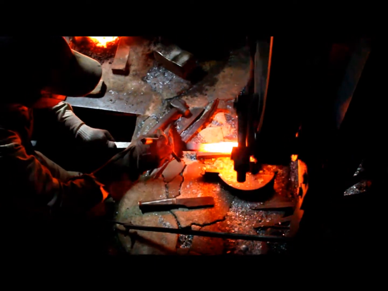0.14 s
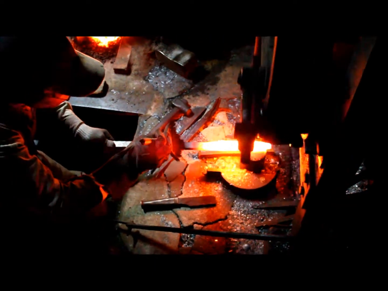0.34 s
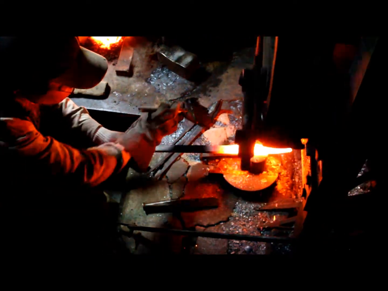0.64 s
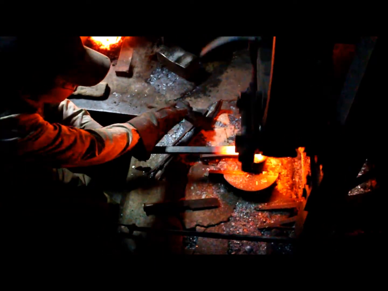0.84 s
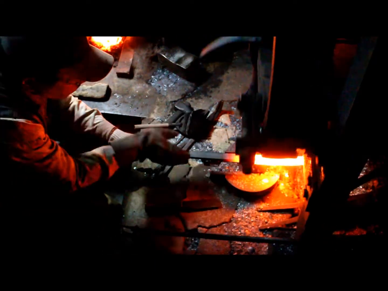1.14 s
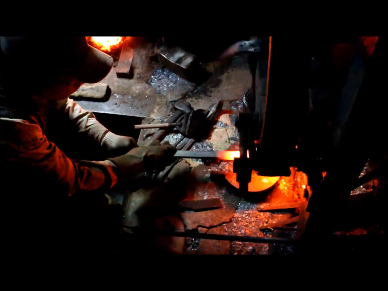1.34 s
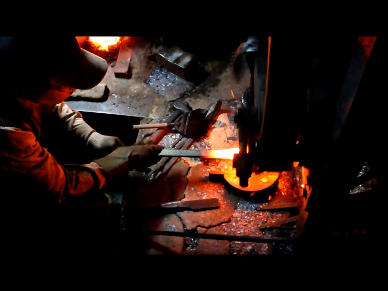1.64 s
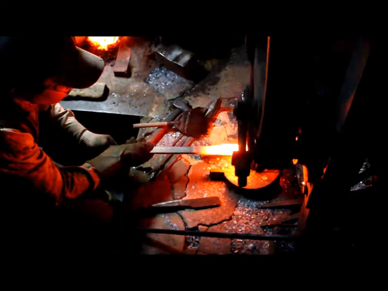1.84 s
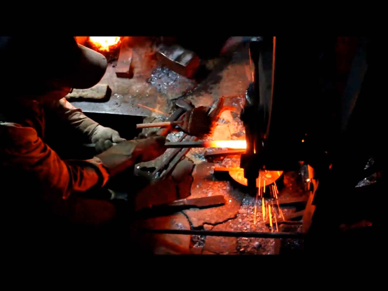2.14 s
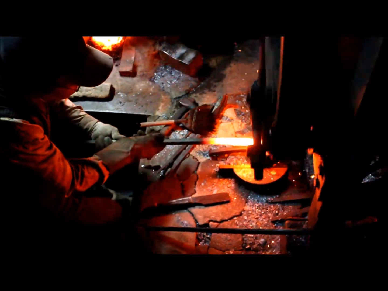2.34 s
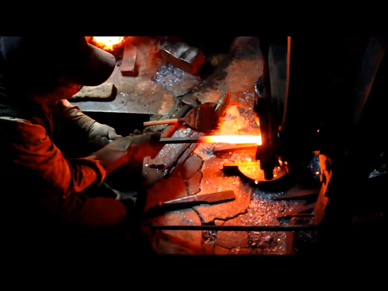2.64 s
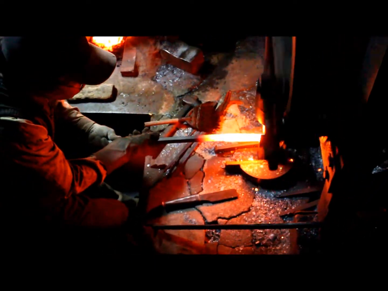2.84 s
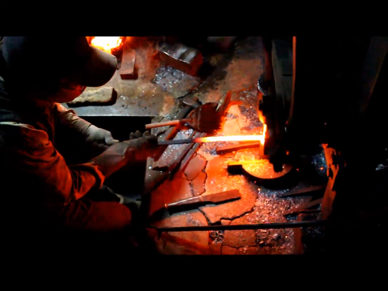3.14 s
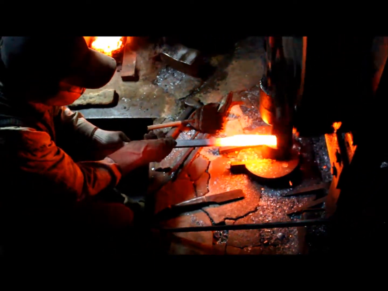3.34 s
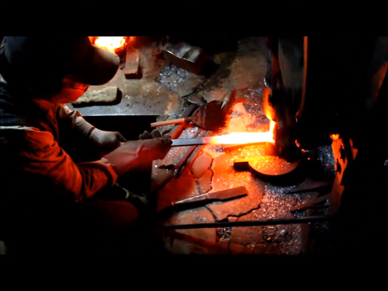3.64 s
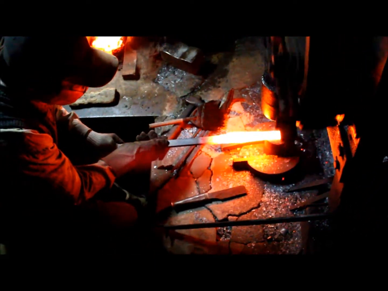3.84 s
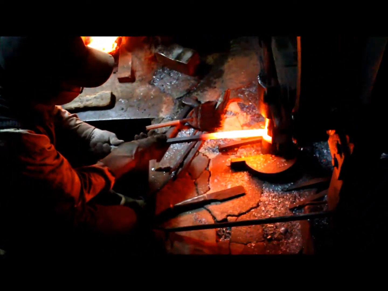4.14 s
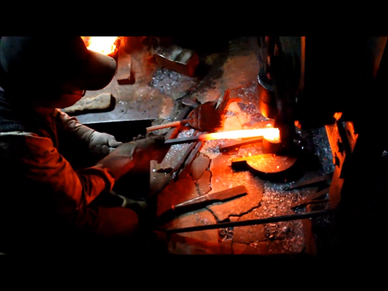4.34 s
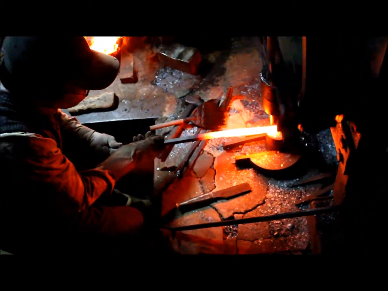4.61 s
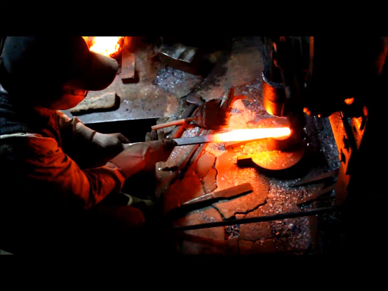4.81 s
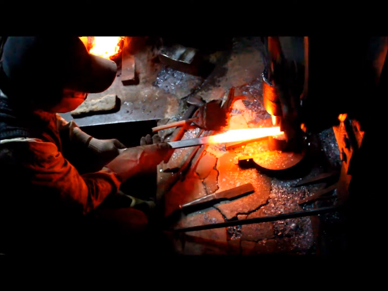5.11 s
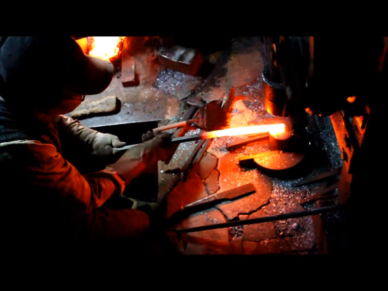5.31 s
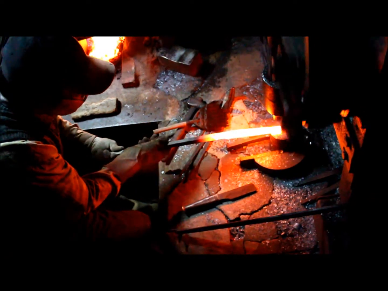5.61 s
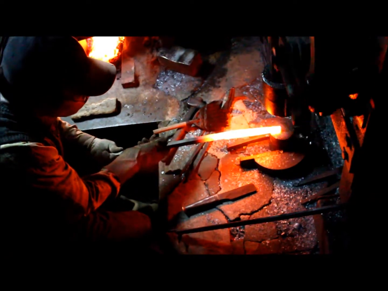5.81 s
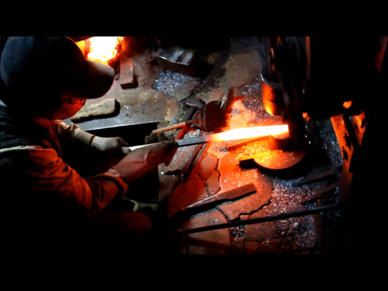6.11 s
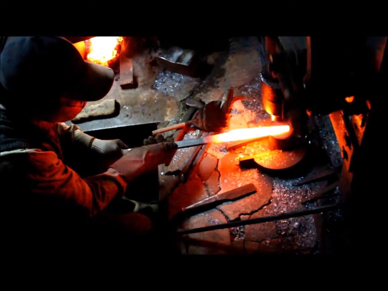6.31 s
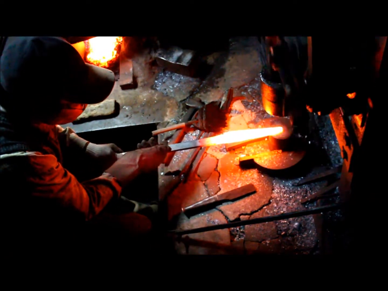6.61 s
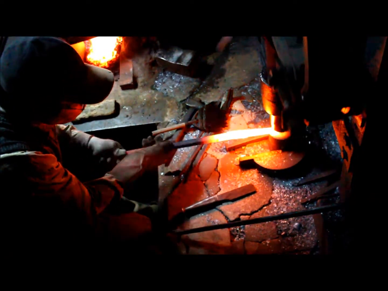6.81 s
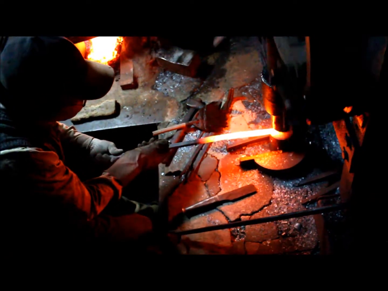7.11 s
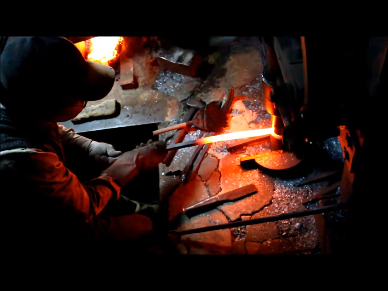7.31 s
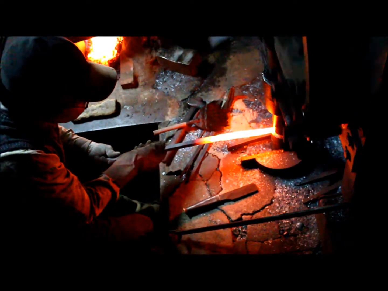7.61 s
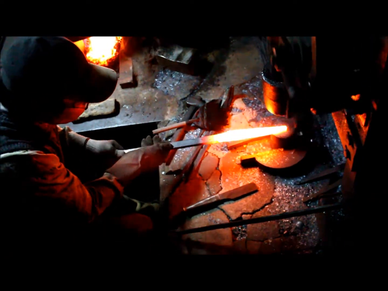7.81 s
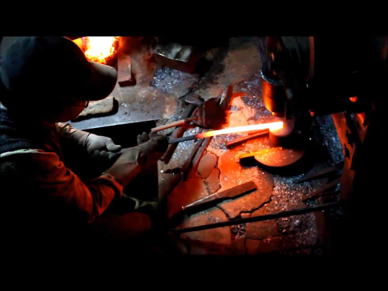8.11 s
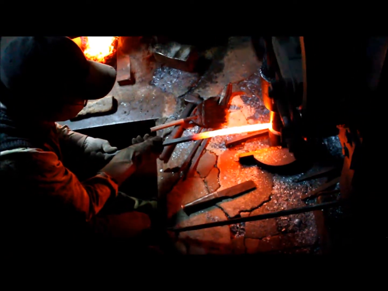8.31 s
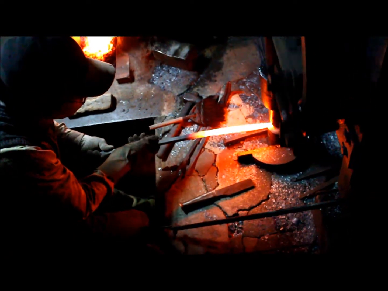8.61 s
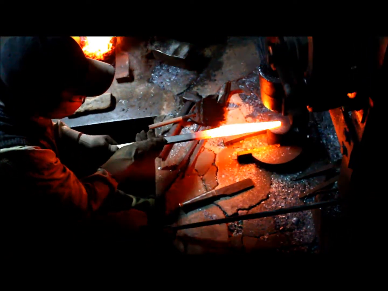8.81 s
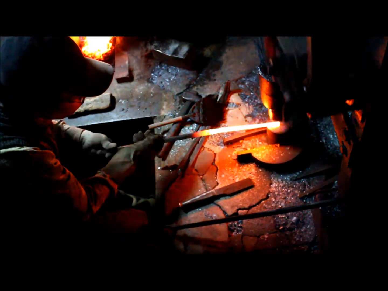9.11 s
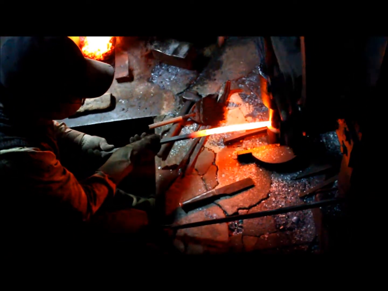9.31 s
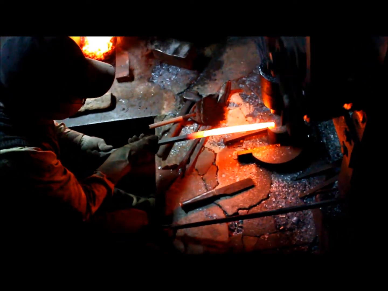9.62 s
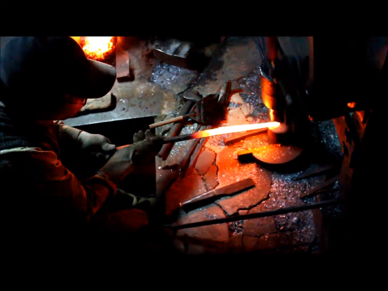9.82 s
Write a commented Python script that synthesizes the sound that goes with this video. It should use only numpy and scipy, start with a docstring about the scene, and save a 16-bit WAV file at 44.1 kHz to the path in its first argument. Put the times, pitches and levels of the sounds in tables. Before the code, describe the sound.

Rapid metallic hammering, about four strokes a second, with clattering loose ironwork, dull anvil thuds and a regular thin squeal over faint machine rumble.

```python
"""A mechanical power hammer forges hot steel in a workshop, close to a small microphone.
Slack linkage clanks, spring arms slap and the dies meet in noisy chatters that ring modes; the anvil thuds.
Rattling guides are shaped noise with clicks, and the drive belt squeals once a turn of the flywheel as a tone.
The drive and the low roar of the forge are lumpy noise beneath; a short workshop echo follows the hammer."""
import sys
import numpy as np
from scipy import signal
from scipy.fft import rfft, irfft
from scipy.io import wavfile
from scipy.ndimage import uniform_filter1d

SR = 44100
rng = np.random.default_rng(int(sys.argv[2]) if len(sys.argv) > 2 else 0)


def pcm_store(signal):
    """Save signal as 16-bit PCM."""
    levels = np.round(np.clip(np.atleast_2d(signal), -1, 1) * 32767)
    wavfile.write(sys.argv[1], SR, levels.astype(np.int16).T)


N = 438794
SIZE = 8192  # samples in one knock, thud or squeal
HZ = np.fft.rfftfreq(SIZE, 1 / SR)
T = np.arange(SIZE) / SR


def amp(db):
    """dB to gain."""
    return 10 ** (np.asarray(db) / 20)


def evened(x, count=None):
    """Scales to rms 1 over the first samples."""
    return x / np.sqrt(np.mean(x[:count] ** 2) + 1e-20)


def read(points, hz):
    """Reads a table on a log-frequency axis."""
    f, value = np.transpose(points)
    return np.interp(np.log(hz + 1), np.log(f + 1), value)


def along(curve, s):
    """Reads a curve in time."""
    return np.interp(s, *np.transpose(curve))


def add(mix, s, sound):
    """Mixes a sound in at time s, cut at the ends of the mix."""
    at = round(s * SR)
    part, sound = mix[max(at, 0):at + len(sound)], sound[max(-at, 0):]
    part += sound[:len(part)]


def rings(modes):
    """Spectrum of each mode, a sine dying by 60 dB in its t60."""
    return np.array([rfft(amp(db - 60 * T / t60) * np.sin(2 * np.pi * hz * T)) for hz, db, t60 in modes])


def causal(colour):
    """Minimum-phase spectrum of a colour, so its energy comes at the onset."""
    log_gain = np.log(amp(read(colour, HZ)))
    mirrored = np.r_[log_gain, log_gain[-2:0:-1]]
    return np.exp(np.conj(signal.hilbert(mirrored))[:len(HZ)])


def noise(colour_db, patchy_db, flicker_db, size):
    """Random short-time spectra with patches and wide flicker; colour_db(hz, t) gives the field."""
    hop = size // 4
    frames = N // hop + 5
    hz, t = np.fft.rfftfreq(size, 1 / SR), np.arange(frames) * hop / SR
    a, b, patches = rng.standard_normal((frames, len(hz), 3)).T
    patches = uniform_filter1d(patches, size=4, axis=0)
    patches = evened(uniform_filter1d(patches, size=8, axis=1))
    flicker = evened(uniform_filter1d(rng.standard_normal(frames), size=3))
    level_db = colour_db(hz[:, None], t) + patchy_db * patches + flicker_db * flicker
    z = (a + 1j * b) * amp(level_db)
    return signal.istft(z, nperseg=size, noverlap=size - hop)[1][:N]


# slack linkage taken up as the ram is driven down: (t/s, clank level/dB, chatter scale/s, guide rattle level/dB)
CLANKS = [(-.1, -29, .015, -31), (.172, -31, 0.021, -34), (.455, -27.5, 0.012, -34.5),
          (.743, -28.5, .013, -32.5), (1.035, -30, 0.01, -35.5), (1.333, -27.5, 0.011, -31),
          (1.594, -24.5, 0.019, -28), (1.867, -25, 0.013, -28), (2.134, -26, 0.0096, -26),
          (2.387, -18.5, 0.023, -26), (2.637, -24, 0.027, -26), (2.89, -22, 0.022, -25),
          (3.145, -24.5, 0.027, -26), (3.41, -18.5, 0.016, -25.5), (3.66, -24, 0.023, -27.5),
          (3.909, -21.5, 0.014, -26.5), (4.159, -22.5, 0.0088, -25.5), (4.407, -15.5, 0.018, -24.5),
          (4.657, -20, 0.019, -22), (4.906, -16, 0.0092, -26.5), (5.157, -22, 0.017, -24),
          (5.408, -22, 0.023, -21), (5.669, -18.5, 0.011, -20.5), (5.927, -18, .014, -20.5),
          (6.186, -11.5, 0.0082, -24.5), (6.454, -25, 0.02, -25), (6.728, -22, 0.013, -24.5),
          (7.012, -21, 0.014, -25), (7.312, -14, 0.014, -25.5), (7.622, -18, 0.014, -23.5),
          (7.945, -16, 0.016, -26), (8.28, -16.5, 0.016, -23.5), (8.626, -15.5, 0.0095, -22),
          (8.979, -11.5, 0.0086, -25.5), (9.32, -16.5, 0.01, -22), (9.677, -11.5, 0.0095, -25.5)]
# spring arms slapping at the foot of the stroke: (t/s, level/dB)
SLAPS = [(.261, -22.5), (.544, -21), (0.83, -23), (1.127, -22.5), (1.422, -20), (1.686, -15), (1.956, -14),
         (2.226, -16), (2.471, -16), (2.724, -14.5), (2.977, -14.5), (3.235, -14.5), (3.501, -15.5),
         (3.754, -16), (3.999, -14), (4.245, -15), (4.493, -13), (4.743, -14), (4.994, -16.5),
         (5.249, -13.5), (5.497, -14.5), (5.756, -13.5), (6.015, -14.5), (6.278, -14.5), (6.545, -13),
         (6.814, -18.5), (7.101, -13), (7.403, -13), (7.711, -15), (8.033, -19), (8.366, -17), (8.712, -16),
         (9.069, -15), (9.403, -17), (9.781, -18.5)]
# ram landing on the hot bar: (t/s, dies level/dB, anvil thud level/dB)
BLOWS = [(0, -23.5, -34), (.273, -22, -25.5), (.559, -19, -24.5), (.844, -19, -26.5), (1.142, -19.5, -25.5),
         (1.437, -19.5, -23), (1.697, -16, -21.5), (1.967, -16, -23), (2.226, -30, -22),
         (2.476, -17.5, -26), (2.726, -24, -23.5), (2.982, -22.5, -23.5), (3.239, -26, -24.5),
         (3.507, -16.5, -17.5), (3.755, -16, -18), (4.002, -19, -21), (4.249, -23, -23), (4.499, -31, -21),
         (4.748, -19, -19.5), (5, -14, -15), (5.253, -16.5, -15.5), (5.502, -20.5, -19), (5.764, -16, -27),
         (6.024, -14, -24), (6.287, -14, -16.5), (6.554, -13, -19.5), (6.827, -15.5, -15.5),
         (7.113, -18, -18), (7.415, -25, -22.5), (7.729, -15, -16), (8.059, -14.5, -14),
         (8.393, -17.5, -17), (8.74, -22, -22.5), (9.099, -18.5, -13.5), (9.429, -16.5, -17.5),
         (9.799, -23, -16.5)]
# loose parts tapping between the strokes: (t/s, level/dB)
TAPS = [(.312, -33), (0.497, -42), (.521, -32.5), (1.666, -23.5), (1.909, -28), (1.972, -29), (2.015, -34),
        (2.164, -40), (3.273, -29.5), (3.306, -34), (3.701, -28), (4.196, -30), (4.287, -25),
        (4.549, -28.5), (4.971, -29), (5.34, -33.5), (5.554, -26.5), (5.697, -26), (5.722, -36),
        (5.857, -30), (5.972, -38), (5.99, -27), (6.113, -26.5), (6.167, -30), (6.228, -25.5), (6.492, -25),
        (7.08, -26), (7.281, -28.5), (7.562, -31.5), (7.812, -27), (7.905, -28), (8.183, -31.5),
        (8.691, -33), (8.768, -29), (8.789, -28.5), (8.932, -50), (8.952, -31), (9.021, -45), (9.229, -35),
        (9.298, -25.5), (9.38, -37), (9.512, -30), (9.574, -26.5), (9.758, -20.5), (9.82, -18.5),
        (9.86, -26), (9.872, -22)]
# brightness, added to the level of the links over the frame: (t/s, level/dB)
BRIGHT = [(0, 10), (1.1, 9.5), (1.7, 3), (2.6, 2), (4, 0.5), (4.6, -3.5), (5.6, -2.5), (6.3, -3),
          (7.3, -3.5), (8.3, -3.5), (9.95, -3.5)]
# tone of each kind of knock: (links level/dB and tick level/dB over the frame, favoured ring f/Hz,
# its rise in Hz per dB of positive brightness, ring level/dB, bass edge f/Hz)
CLANK_TONE = (1, -15, 2903, 95, 5.5, 253)
SLAP_TONE = (-1, -14, 3683, 8, -7, 123)
DIE_TONE = (-0.5, -14, 4306, -1.5, 5, 100)
TAP_TONE = (-8, -19.5, 1602, 5, -16, 200)
SLAP_S, DIE_S, TAP_S = 0.011, 0.0092, 0.021  # chatter scales; the slap's is a base
SLAP_PER_WAIT = 0.16  # a slap chatters longer when the blow comes late (s per s)
TICK_SHARE = 0.66  # of the brightness that the tick follows


def contacts_made():
    """Every knock with its levels, chatter and ring, toned by its kind and the brightness of the moment."""
    rows = [(s, db, chatter, *CLANK_TONE) for s, db, chatter, _ in CLANKS]
    for (s, db), blow in zip(SLAPS, BLOWS[1:]):
        wait = blow[0] - s - .01
        rows.append((s, db, SLAP_S + SLAP_PER_WAIT * wait, *SLAP_TONE))
    rows += [(s, db, DIE_S, *DIE_TONE) for s, db, _ in BLOWS]
    rows += [(s, db, TAP_S, *TAP_TONE) for s, db in TAPS]
    s, frame_db, chatter, links_over, tick_over, ring_hz, rise_hz, ring_db, edge_hz = np.transpose(rows)
    bright = along(BRIGHT, s)
    links_db = frame_db + links_over + bright
    tick_db = frame_db + tick_over + TICK_SHARE * bright
    ring_hz = ring_hz + rise_hz * np.maximum(bright, 0)
    return zip(s, links_db, frame_db, tick_db, chatter, ring_hz, ring_db, edge_hz)


# modes of the frame, the links and the dies: (f/Hz, relative level/dB, t60/s)
FRAME = [(474, 0.5, 0.04), (622, -16.5, 0.074), (864, -27, 0.04), (1018, -1.5, 0.049), (1128, -6, 0.07),
         (1267, 1.5, 0.036), (1396, -1.5, 0.027), (1487, -13.5, 0.079), (1700, -22, 0.087),
         (1882, -4, 0.082), (2082, -6.5, 0.038)]
LINKS = [(2277, -4, 0.052), (2310, -4, 0.1), (2790, -37, 0.046), (2886, -5, 0.031), (3240, -12, 0.031),
         (3500, -13, 0.043), (3670, 13, 0.02), (3900, -1.5, 0.092), (3900, -1, 0.032), (4260, -4, 0.077),
         (4670, -2, 0.04), (5030, -22, 0.049), (5420, -6.5, 0.051)]
DIES = [(6417, 8.5, 0.035), (6680, -4, 0.034), (7600, -13, 0.057), (8200, -19, 0.033), (9580, -8, .03)]
# contact noise in the frame, in the links and as a sharp tick: (f/Hz, relative level/dB)
FRAME_CRACK = [(100, -33), (250, -6.5), (500, 0.5), (1000, 5), (2000, 4), (3000, -5.5), (5000, -54.5)]
LINK_CRACK = [(800, -43), (1800, -1.5), (2600, 5.5), (4300, 9), (6000, -10.5), (9000, -43)]
TICK = [(3500, -41.5), (6000, 4.5), (9500, -9.5), (12000, -26), (15500, -31)]
LINK_TILT = 0.13  # brighter knocks reach the higher links (dB per octave for each dB of brightness)
FAVOURED_T60_S = 0.075


def knocks():
    """Each knock is a short chatter of contacts that rings frame, links and dies, a little differently each time."""
    out, frame, links, dies = np.zeros(N), rings(FRAME), rings(LINKS), rings(DIES)
    frame_crack, link_crack, tick = causal(FRAME_CRACK), causal(LINK_CRACK), causal(TICK)
    fade = np.clip((T[-1] - T) / .06 - .3, 0, 1)
    onset = 1 - np.exp(-(T / 0.0025) ** 2)
    for s, links_db, frame_db, tick_db, chatter, ring_hz, ring_db, edge_hz in contacts_made():
        draw = rng.standard_normal((4, SIZE))
        bursts = evened(uniform_filter1d(draw[3], size=70))  # contacts come in clumps
        contacts = draw[0] * amp(4.77 * draw[1] + 2.07 * bursts) * onset
        # the place struck sets each mode's share and sign
        spot = amp(2.4 * np.tanh(draw[2])) * np.sign(draw[0])
        # each knock favours other bands
        shade = amp(2.03 * evened(uniform_filter1d(draw[3, :len(HZ)], size=90)))
        dying = np.exp(-(T / max(1.13 * chatter, .002)) ** 1.096)
        push = shade * rfft(contacts * dying)
        quick_dying = np.exp(-T / max(0.72 * chatter, .002))
        quick = shade * rfft(contacts * amp(5.1 * draw[2]) * quick_dying)

        bass_cut = HZ ** 2 / (HZ ** 2 + edge_hz ** 2)
        frame_ring = spot[:len(FRAME)] @ frame + amp(35) * frame_crack
        low = irfft(push * bass_cut * frame_ring)

        octaves = np.log2(np.clip(HZ, 2000, 6000) / 3300)
        tilt = amp(LINK_TILT * (links_db - frame_db - 7) * octaves)
        favoured = rings([(ring_hz, ring_db, FAVOURED_T60_S)])[0]
        mid = irfft(tilt * push * (spot[-len(LINKS):] @ links + favoured + amp(39) * link_crack))

        die_ring = amp(-38.5) * spot[len(FRAME):][:len(DIES)] @ dies
        high = irfft(quick * (die_ring + tick))

        sound = amp(frame_db) * evened(low, count=400)
        sound += amp(links_db) * evened(mid, count=400)
        sound += amp(tick_db) * evened(high, count=400)
        add(out, s - .001, sound * fade)
    return out


# modes of the anvil block: (f/Hz, relative level/dB, t60/s)
ANVIL = [(342.5, 11.5, 0.04), (225, -4.5, 0.065), (180, -18, 0.058), (413, -18, .05)]
# floor thump under a blow: (t/s, level/dB)
THUMP = [(0, -50), (2.2, -44), (5.2, -34.5), (7, -39), (9.95, -25.5)]


def blows():
    """A soft push through hot steel rings the anvil block; the floor thumps just after."""
    out, anvil = np.zeros(N), rings(ANVIL)
    push = rfft(np.sin(2 * np.pi * 300 * T) * np.exp(-((T - .004) / 0.0022) ** 2))
    for s, _, thud_db in BLOWS:
        draw = rng.standard_normal(len(ANVIL) + 1)
        thud = irfft(push * (amp(1.6 * draw[1:]) @ anvil))
        add(out, s - .002, amp(thud_db) * evened(thud, count=500))
        since = T - .016  # from the thump's peak
        thump_hz = 85 * (1 + 0.07 * draw[0])
        thump = np.cos(2 * np.pi * thump_hz * since) * np.exp(-(since / 0.015) ** 2)
        add(out, s, amp(along(THUMP, s)) * evened(thump, count=1200))
    return out


# noise colour of the rattle: (f/Hz, relative level/dB)
GUIDE_COLOUR = [(59, -44), (100, -32), (416, 10.5), (849, 1.5), (1050, 7), (2320, -3), (2520, 3.5),
                (2920, -6.5), (6480, -30), (6910, -48), (15000, -82)]
# rattle dying away after the hold: (f/Hz, t60/s)
SETTLING = [(150, 0.47), (600, 0.21), (2500, 0.069), (6000, 0.36), (14000, 0.17)]
RATTLE_HOLD_S = 0.027  # held past the blow
RATTLE_TILT_DB, TILT_PER_BRIGHT = 5.5, 0.96  # treble tilt per octave above 2 kHz; more per dB of brightness
PINGS_PER_S, PINGS_DB = 73, 3.5  # sparse sharp ticks in the rattle; gain over its level


def guides():
    """The ram rattles in its guides from clank to blow, then each band settles at its own speed."""
    def field_db(hz, t):
        """Sums the rattle of all strokes over frequency and time."""
        power = np.full((len(hz), len(t)), 1e-12)
        for (s, _, _, db), (blow, _, _) in zip(CLANKS, BLOWS):
            treble_db = RATTLE_TILT_DB + TILT_PER_BRIGHT * along(BRIGHT, s)
            tilt_db = treble_db * np.clip(np.log2(hz / 2000 + 1e-9), 0, 2)
            on = slice(*np.searchsorted(t, [s + .006, s + .5]))
            after = np.maximum(t[on] - blow - RATTLE_HOLD_S, 0)
            settling_db = 60 * after / read(SETTLING, hz)
            slow_fall_db = 6.3 * (t[on] - s)
            power[:, on] += amp(db + tilt_db - settling_db - slow_fall_db) ** 2
        return read(GUIDE_COLOUR, hz) + 10 * np.log10(power)

    even_field = noise(lambda hz, t: read(GUIDE_COLOUR, hz) + 0 * t, patchy_db=-0.5, flicker_db=1.0, size=256)
    unit = np.std(even_field)
    hiss = amp(-1) * noise(field_db, patchy_db=2.0, flicker_db=1.5, size=256) / unit

    # about 500 contacts a second ring the frame and links
    click_level = np.sqrt(abs(uniform_filter1d(hiss ** 2, size=300)))
    clicks = rng.standard_normal(N) * (rng.random(N) < 500 / SR) * click_level
    body = irfft(rings(FRAME).sum(0) + amp(-11) * rings(LINKS).sum(0))
    body = signal.lfilter(signal.windows.hann(9), 1, body)  # a contact takes a moment
    body_clicks = amp(14.5) * signal.oaconvolve(clicks, body / np.linalg.norm(body))[:N]

    ping_level = np.sqrt(abs(uniform_filter1d(hiss ** 2, size=600)))
    pings = rng.standard_normal(N) * (rng.random(N) < PINGS_PER_S / SR) * ping_level
    burst = rng.standard_normal(SIZE) * np.exp(-T / 0.0053)
    ping = irfft(causal(TICK) * rfft(burst))[:1000]
    sharp_ticks = amp(PINGS_DB) * signal.oaconvolve(pings, ping / np.linalg.norm(ping))[:N]
    return hiss + sharp_ticks + body_clicks


# belt slips, once a turn of the flywheel: (t/s near the peak, level/dB, length scale/s)
SQUEALS = [(0.077, -27, .02), (0.359, -26, .022), (0.641, -28.5, .024), (.92, -31, .028), (1.2, -32, .025),
           (1.483, -29.5, .022), (1.762, -26.5, .019), (2.05, -30, .025), (2.326, -24, .023),
           (2.608, -25, .022), (2.894, -26, .032), (3.173, -23.5, .02), (3.451, -27.5, .043),
           (3.743, -24, .042), (4.018, -33, .03), (4.295, -29, .047), (4.573, -30, .03), (4.846, -28, .04),
           (5.138, -33.5, .046), (5.399, -27.5, .02), (5.7, -27.5, .04), (5.966, -24, .027),
           (6.262, -24.5, .031), (6.528, -26.5, .033), (6.808, -23, .016), (7.088, -24, .032),
           (7.379, -28.5, .07), (7.656, -26.5, .035), (7.929, -24, .038), (8.216, -25.5, .053),
           (8.492, -24.5, .04), (8.774, -24.5, .021), (9.054, -24.5, .045), (9.326, -15.5, .015),
           (9.611, -19.5, .047), (9.89, -19.5, .037)]
# whine left after a slip, relative to the squeal: (t/s, level/dB)
TRAIL = [(0, -14), (2.4, -13), (2.7, -14), (4, -22), (4.4, -14), (5.5, -24), (7.5, -9), (8.2, -14),
         (8.9, -16), (9.3, -24), (9.95, -10)]
# belt scuffing on iron: (f/Hz, relative level/dB)
SCUFF = [(600, -13), (1500, 7), (3500, 1), (5250, 2), (6500, -7.5), (8300, -19.5), (11000, -30),
         (16000, -60)]
SQUEAL_HZ, SHARPER_HZ_PER_DB, WAVER = 2538, .9, .004  # pitch of a -54 dB squeal; its rise; rms share of pitch
RISE_SHARE = .55  # of a slip's length
TRAIL_DB_PER_S = 82  # fall of the whine
AGAIN_S, AGAIN_DB, AGAIN_LENGTH_S = .064, -5, 0.017  # second swell: after the peak, over the trail, width
OCTAVE_DB = -25  # second partial of the squeal


def belt():
    """Stick-slip locks onto one pulley mode, a little sharper when louder; it scuffs, and a faint whine trails."""
    out = np.zeros(N)
    for s, db, length in SQUEALS:
        rise, fall = RISE_SHARE * length, (1 - RISE_SHARE) * length
        draw = rng.standard_normal((3, SIZE))
        waver, grip = (evened(uniform_filter1d(v, size=120)) for v in draw[:2])
        pitch_hz = (SQUEAL_HZ + SHARPER_HZ_PER_DB * (db + 54)) * (1 + WAVER * waver)
        turns = np.cumsum(pitch_hz) / SR

        since = T - 1.27 * rise  # from the peak
        trail_db = along(TRAIL, s)
        slip = amp(-8.5 * np.where(since < 0, since / rise, since / fall) ** 2)
        again = amp(trail_db + AGAIN_DB - 8.5 * ((since - AGAIN_S) / AGAIN_LENGTH_S) ** 2)
        trail = amp(trail_db - TRAIL_DB_PER_S * since) * np.clip(since / fall, 0, 1)
        trail = trail * signal.windows.tukey(SIZE, .2)

        scuff = evened(irfft(rfft(draw[2]) * amp(read(SCUFF, HZ))))
        tone = np.sin(2 * np.pi * turns) + amp(OCTAVE_DB) * np.sin(2 * np.pi * 2 * turns)
        squeal = tone + amp(-14) * scuff
        add(out, s - 1.3 * rise, np.sqrt(2) * amp(db + 2.65 * grip) * (slip + again + trail) * squeal)
    return out


# workshop echo dying away: (f/Hz, t60/s)
SHOP = [(150, 0.15), (600, 0.38), (2000, 0.25), (6000, 0.25), (14000, 0.32)]


def shop(x):
    """Workshop echo: sparse taps of random sign, each band dying at its own speed."""
    taps = np.zeros(SR // 2)
    at = np.arange(200, len(taps) - 20, 20)
    taps[at + rng.integers(0, 20, len(at))] = rng.choice([-1., 1.], len(at))
    hz, t, z = signal.stft(taps, SR, nperseg=256)
    dying = amp(-60 * t / read(SHOP, hz)[:, None])
    tail = signal.istft(z * dying, SR, nperseg=256)[1]
    return signal.oaconvolve(x, tail / np.linalg.norm(tail))[:N]


def steady(level, colour, size):
    """Lumpy noise of one colour on a slow level."""
    wash = noise(lambda hz, t: read(colour, hz) + 0 * t, patchy_db=2.0, flicker_db=2.9, size=size)
    return amp(along(level, np.arange(N) / SR)) * evened(wash)


# drive running, before the mix: (t/s, level/dB)
IDLE = [(0.0, -35), (2.44, -26), (4.04, -28.5), (4.6, -24.5), (9.39, -29), (9.95, -18)]
# its noise colour: (f/Hz, relative level/dB)
IDLE_COLOUR = [(120, -37), (200, -9), (363, 7.5), (659, -4.5), (1040, 6.5), (1570, 2), (2510, 2),
               (6190, -22), (15000, -72)]


def drive():
    """The running drive is broad machine noise."""
    return steady(IDLE, IDLE_COLOUR, size=512)


# forge roar, before the mix: (t/s, level/dB)
ROAR = [(0.0, -50), (9.42, -31), (9.95, -22.5)]
# its noise colour: (f/Hz, relative level/dB)
ROAR_COLOUR = [(20, 6), (40, 15.5), (80, -3.5), (184, 6.5), (300, -2), (600, -1), (900, -43.5),
               (2000, -100)]


def forge():
    """The forge roars as low noise."""
    return steady(ROAR, ROAR_COLOUR, size=2048)


def scene():
    """Hammer and belt with their echo, guides, drive and forge."""
    hammer = knocks() + blows() + belt()
    machine = hammer + amp(-14.5) * shop(hammer) + guides()
    return (machine + amp(-9.5) * drive() + amp(-2.5) * forge())[None]


MIC_HZ = 115  # the small capsule loses bass below this
OVERLOAD = 1.25  # ceiling of the soft overload, in sample amplitude
EDGE_HZ = 15735  # upper band limit


def record(dry):
    """The capsule loses bass, the loudest peaks overload; then the band limit."""
    thin = signal.sosfilt(signal.butter(2, MIC_HZ, "high", fs=SR, output="sos"), dry)
    held = OVERLOAD * np.tanh(thin / OVERLOAD)
    band = signal.firwin(1023, EDGE_HZ, window=("kaiser", 9), fs=SR)
    return signal.oaconvolve(held, band[None], "same")


dry = scene()
out = record(dry)
pcm_store(out)
```